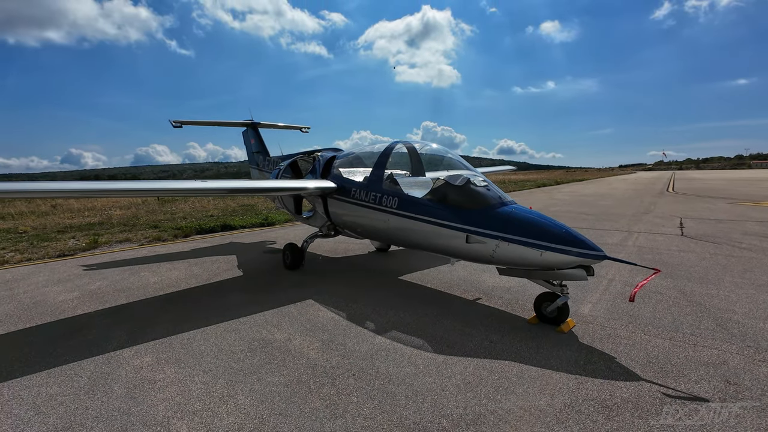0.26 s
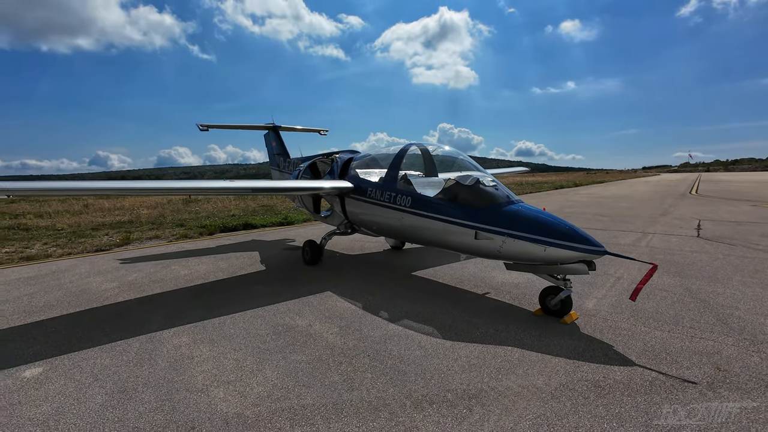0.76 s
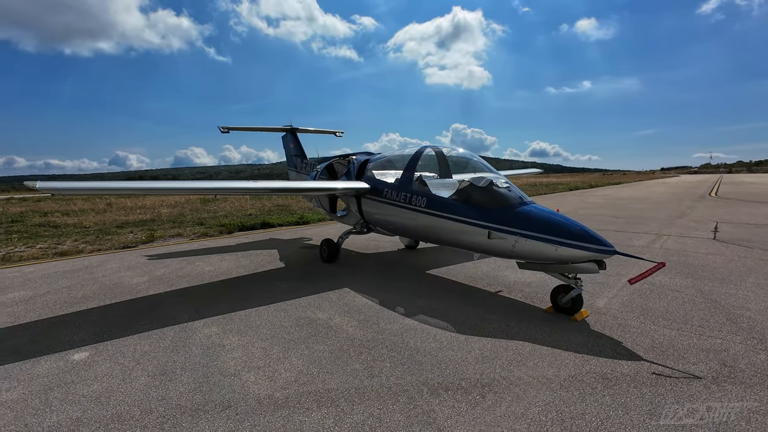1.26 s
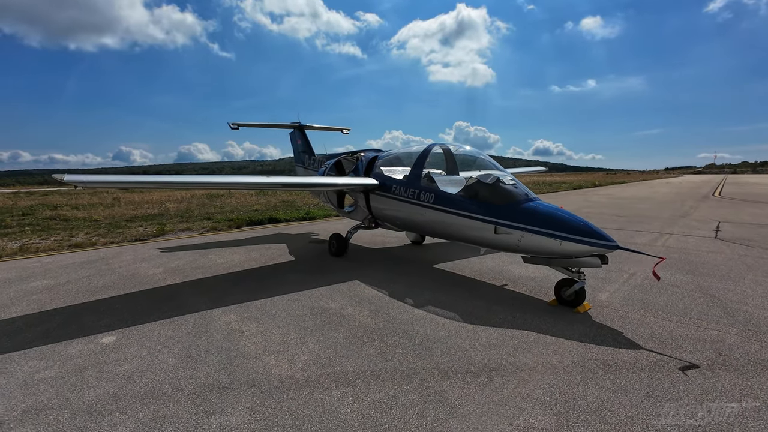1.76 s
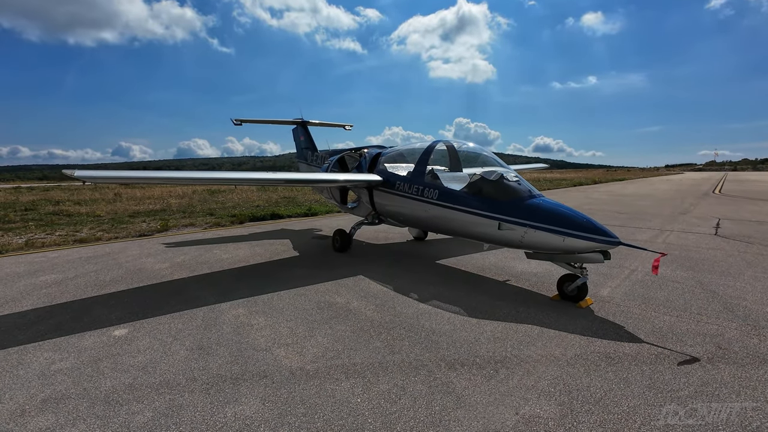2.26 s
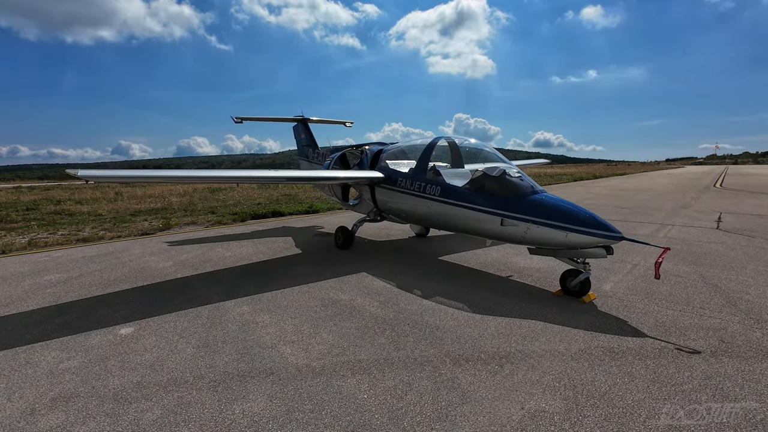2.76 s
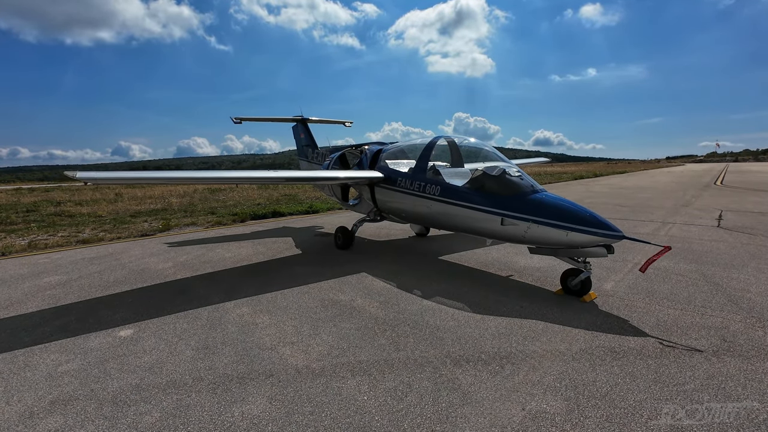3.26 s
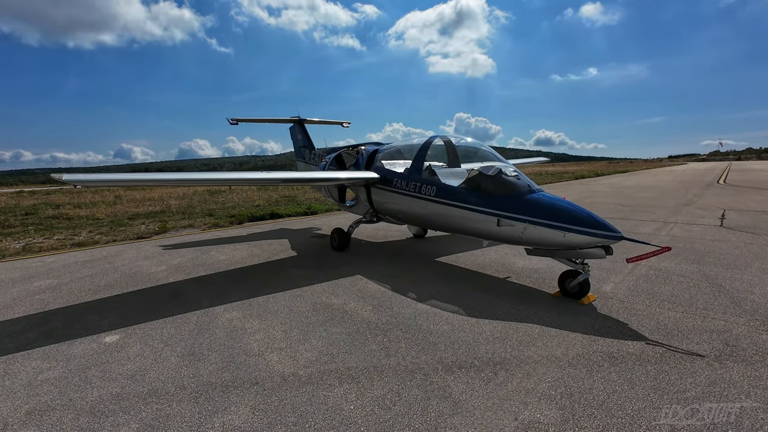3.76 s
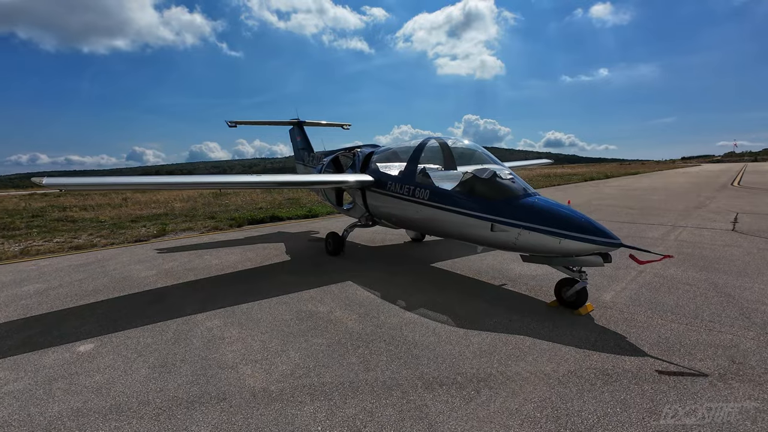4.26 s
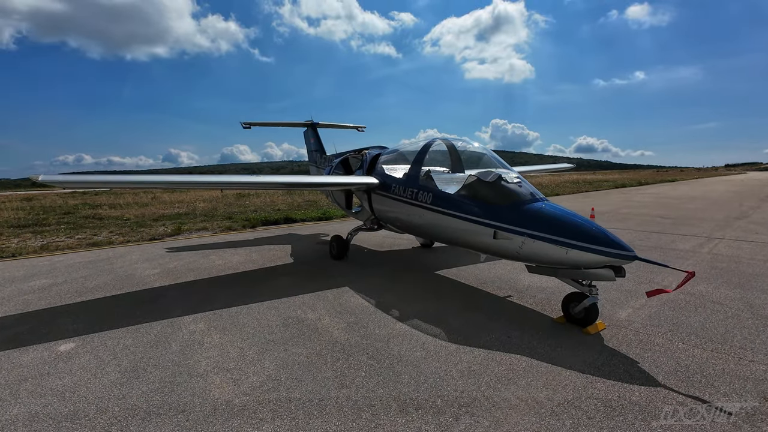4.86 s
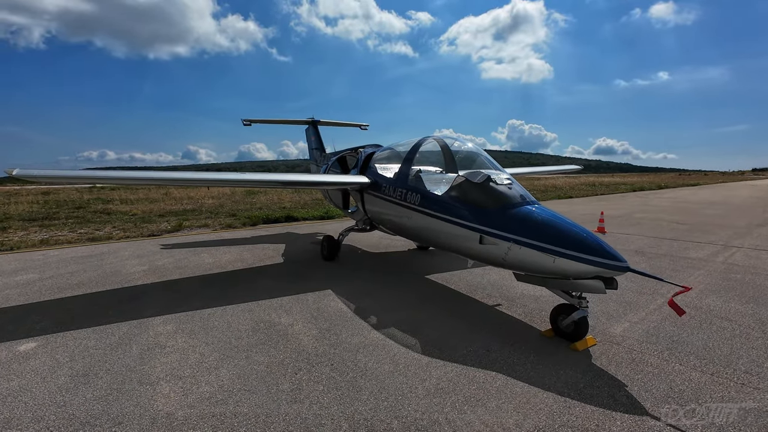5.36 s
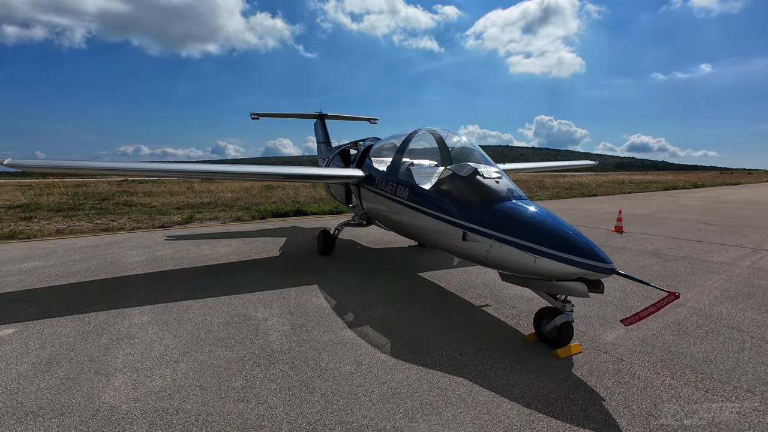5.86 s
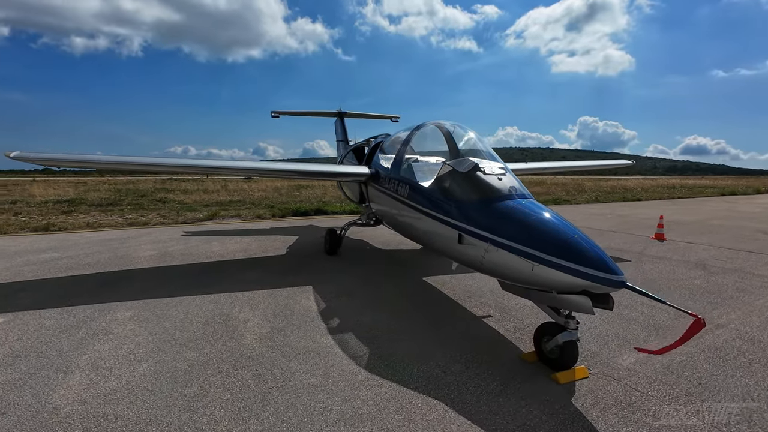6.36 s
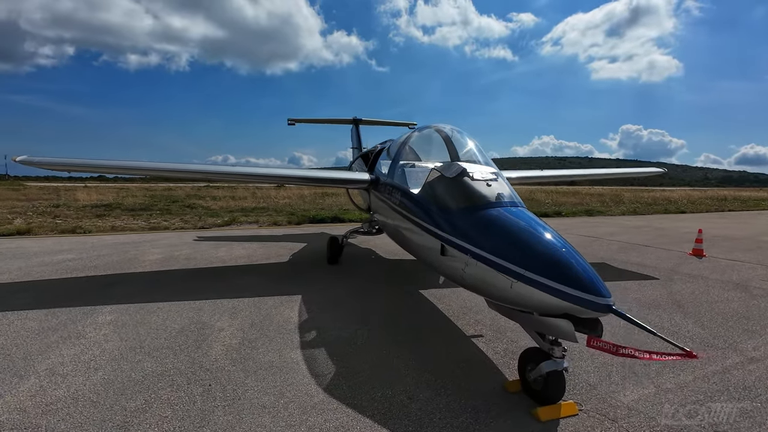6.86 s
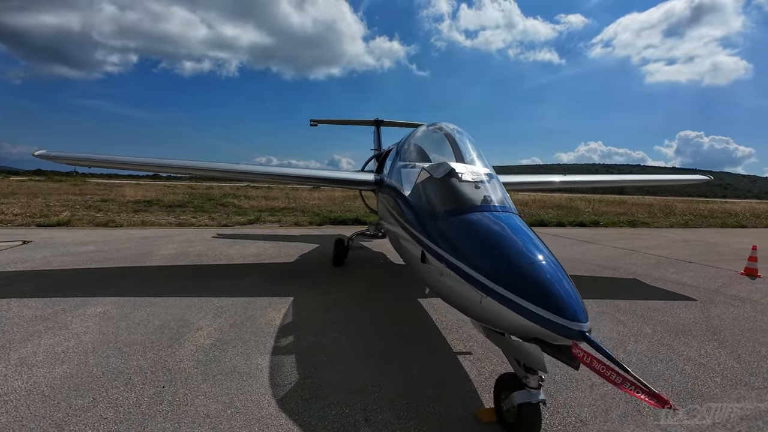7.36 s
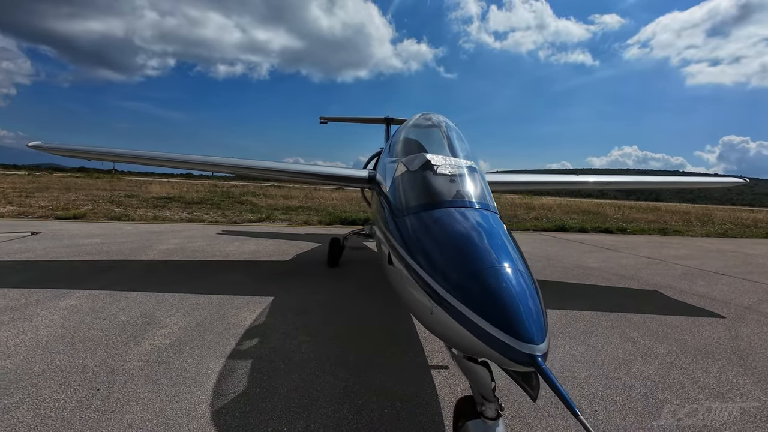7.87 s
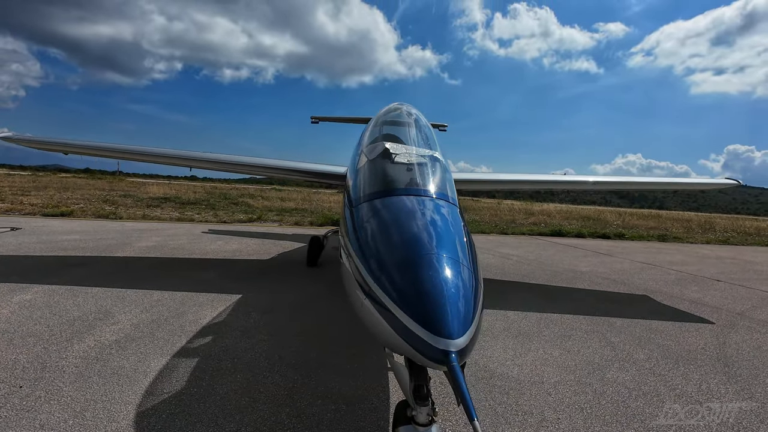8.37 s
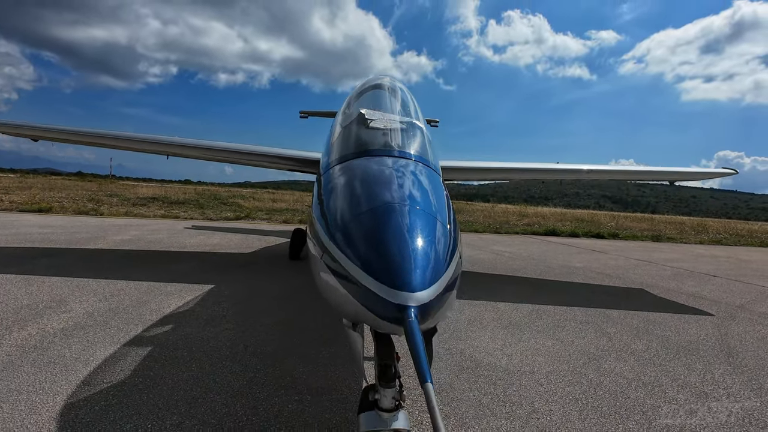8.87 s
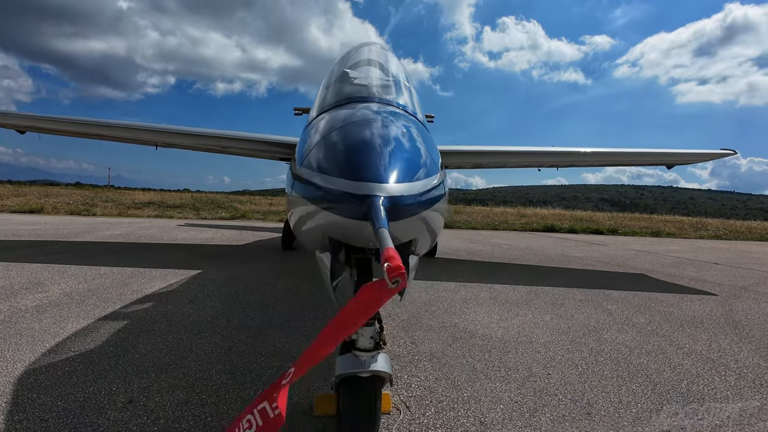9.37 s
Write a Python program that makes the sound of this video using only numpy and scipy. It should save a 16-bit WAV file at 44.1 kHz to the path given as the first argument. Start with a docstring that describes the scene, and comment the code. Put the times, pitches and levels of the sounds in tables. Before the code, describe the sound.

An idling jet engine runs throughout on an open apron, off to one side: low exhaust drone, thick midrange roar, a steady lower whine near 1 kHz and a piercing compressor whine near 3.2 kHz, flickering as the wind carries it. Airy hiss and very faint thin whistles sit above. A wind bump opens the scene; hard thumps hit the microphone at about 0.75 and 0.95 s, with softer low gusts until 2.5 s. The middle is calmer, mostly engine, with a small ribbon snap and knock at 4.7 s. From 6.5 s gusts come close together, rumbling and fluttering, with strong thuds around 6.8, 7.1, 7.8, 8.4 and 8.9 s, while the nearby ribbon ticks faintly and dryly. At 9.15 s comes the heaviest thump, then a sharp cloth whip at 9.24 s. The engine continues to the end at 9.6 s. Handheld camera microphone, mono bass, wide treble.

```python
"""Open airport apron, camera microphone carried round a parked aircraft, a jet engine idling off to one side.
From the start: roar, hum and hiss of coloured noise, compressor whines as wavering sines that fade on the wind,
and gusts that shake the microphone as low noise; from 0.7 s hard eddies thump it with single pressure pulses.
At 4.7 s a ribbon on the nose snaps; from 6.5 s it ticks among close-set gusts, and it whips hard at 9.2 s.
Low and middle bands are mono; the image is wide above an edge that first drops at 2.1 s and then now and again."""
import sys
import numpy as np
from scipy import signal
from scipy.fft import rfft, irfft, next_fast_len
from scipy.io import wavfile
from scipy.ndimage import uniform_filter1d, map_coordinates

SR = 44100
rng = np.random.default_rng(int(sys.argv[2]) if len(sys.argv) > 2 else 0)


def store_pcm(level_fs):
    """Save levels as 16-bit WAV."""
    pcm = np.round(np.clip(level_fs, -1, 1) * 32767).astype(np.int16)
    wavfile.write(sys.argv[1], SR, np.atleast_2d(pcm).T)


N = 423801  # samples


def amp(db):
    """Decibels to gain."""
    return 10 ** (np.asarray(db) / 20)


def unit(x):
    """Scale to rms 1."""
    return x / np.sqrt(np.mean(x ** 2) + 1e-20)


def along(points, hz):
    """(f/Hz, value) points read on a log frequency axis."""
    f, v = np.transpose(points)
    return np.interp(np.log(hz + 1), np.log(f + 1), v)


def curves(rows):
    """One value per sample for each column after the time."""
    s, *cols = np.transpose(rows)
    return [np.interp(np.arange(N) / SR, s, c) for c in cols]


def swing(rows):
    """A level curve in dB about its own mean."""
    db, = curves(rows)
    return db - db.mean()


def wobble(rate):
    """A smooth random curve, rate knots a second."""
    knots = rng.standard_normal(int(N * rate / SR) + 4)
    return map_coordinates(knots, [np.arange(N) * rate / SR])


def filtered(x, response):
    """x passed through a complex response of frequency."""
    m = next_fast_len(N + SR // 2)
    hz = np.fft.rfftfreq(m, 1 / SR)
    return irfft(rfft(x, m) * response(hz), m)[..., :N]


def noise(spectrum):
    """Coloured noise of rms 1."""
    return unit(filtered(rng.standard_normal(N), lambda hz: amp(along(spectrum, hz))))


def sine(hz):
    """A tone of rms 1 that follows a pitch curve."""
    cycles = np.cumsum(hz) / SR + rng.random()
    return np.sqrt(2) * np.sin(2 * np.pi * cycles)


PATCH_HZ, PATCH_S, PATCH_DB = 600, 0.4, 1.3  # width, duration and rms depth of the drifting patches


def drifting(spectrum):
    """Coloured noise of rms 1 in which moving air lifts and sinks patches of the spectrum."""
    hz, t, z = signal.stft(noise(spectrum), SR, nperseg=512)
    field = rng.standard_normal(z.shape)
    field = uniform_filter1d(field, int(PATCH_HZ / hz[1]), axis=0)
    field = uniform_filter1d(field, int(PATCH_S / t[1]), axis=1)
    patched = z * amp(PATCH_DB * unit(field))
    return unit(signal.istft(patched, SR, nperseg=512)[1][:N])


# low exhaust roar, spectrum before scaling to rms 1 (f/Hz, level/dB)
EXHAUST_SPECTRUM = [(20, -4), (60, -6), (130, -0.5), (200, -6.5), (350, -5.5), (500, -7), (700, -10.5),
                    (950, -14), (1400, -30.5), (4000, -74)]
# low exhaust roar over time (t/s, level/dB)
EXHAUST_LEVEL = [(0, -28.5), (4.3, -28.5), (5.2, -29), (6.3, -30.5), (8.7, -29.5), (9.61, -29)]
# main roar, spectrum before scaling (f/Hz, level/dB)
ROAR_SPECTRUM = [(400, -26.5), (750, -4.5), (950, -0.5), (1150, 0), (1500, -1.5), (1800, -5), (2100, -10.5),
                 (2500, -33), (4000, -45), (8000, -87.5)]
# lower rush, spectrum before scaling (f/Hz, level/dB)
RUSH_SPECTRUM = [(1200, -38), (1750, 0), (2100, 1.5), (2400, -3), (2900, -19), (4000, -51)]
# upper rush, spectrum before scaling (f/Hz, level/dB)
UPPER_RUSH_SPECTRUM = [(1700, -37), (2400, -3), (2850, 3), (3400, 0.5), (3950, -5.5), (4120, -16.5),
                       (6000, -54)]
# rush as the wind carries it over, before trims (t/s, lower band level/dB, upper band level/dB)
RUSH_LEVEL = [(0, -43.5, -45), (0.6, -49, -46), (1.3, -52, -45), (2.2, -46.5, -43.5), (3.1, -45.5, -45),
              (3.75, -41.5, -40.5), (4.5, -47.5, -41.5), (4.8, -44, -43.5), (5.15, -46, -44.5),
              (5.45, -44.5, -41), (5.95, -44.5, -44.5), (6.5, -48, -45), (7.3, -48.5, -47.5),
              (7.75, -45.5, -46.5), (8.2, -52, -48), (9.2, -46, -46), (9.61, -46.5, -50)]
# intake hiss, spectrum before scaling (f/Hz, level/dB)
HISS_SPECTRUM = [(2500, -10.5), (4200, -3), (4800, 1), (5400, 5), (6000, 1), (6600, -5), (7200, -22),
                 (9000, -51.5)]
# intake hiss over time, before a trim (t/s, level/dB)
HISS_LEVEL = [(0, -48), (0.45, -53), (1.7, -52), (2.15, -49), (2.55, -48), (3.0, -51.5), (3.45, -48.5),
              (4.3, -46.5), (5.3, -54.5), (5.8, -50), (6.8, -54.5), (7.6, -55.5), (8.25, -51),
              (8.85, -51.5), (9.25, -56), (9.61, -53.5)]
# upper intake hiss, spectrum before scaling (f/Hz, level/dB)
UPPER_HISS_SPECTRUM = [(5500, -20), (6700, 7), (7300, 7.5), (8200, 3.5), (8800, -12.5), (10700, -7),
                       (11500, -19.5), (12500, -13), (14500, -36), (15500, -60)]
# upper intake hiss over time (t/s, level/dB)
UPPER_HISS_LEVEL = [(0, -59.5), (0.45, -62.5), (0.9, -60.5), (1.4, -60.5), (1.95, -63), (2.1, -59),
                    (2.6, -63.5), (2.95, -62.5), (3.3, -61), (3.43, -58), (3.65, -61.5), (4.2, -62),
                    (4.8, -62.5), (5.25, -67), (5.65, -63), (6.05, -63), (6.18, -61), (6.3, -64.5),
                    (6.75, -65.5), (7.6, -65), (8.25, -61), (8.8, -61.5), (9.2, -64), (9.61, -61)]
# turbine's lower band, spectrum before scaling (f/Hz, level/dB)
SIZZLE_SPECTRUM = [(11000, -48), (12400, -7), (12850, 2), (13300, -9), (14000, -27)]
# turbine's lower band over time, before trims (t/s, level/dB)
SIZZLE_LEVEL = [(0.0, -56), (0.18, -69), (0.52, -57.5), (0.67, -70), (0.82, -65), (1.05, -73), (1.4, -71),
                (1.64, -64), (1.98, -71), (2.3, -77), (2.78, -70.5), (3.8, -70), (4.01, -73), (4.9, -76),
                (5.1, -72), (5.4, -76), (5.8, -69), (6.3, -71), (6.55, -75), (6.85, -65), (7.05, -77),
                (8.51, -79), (8.82, -70), (9.61, -80)]
# turbine's upper band, spectrum before scaling (f/Hz, level/dB)
FIZZ_SPECTRUM = [(12000, -38), (13300, -14), (13950, 2.5), (14350, -5), (14700, -20.5), (15200, -58)]
# turbine's upper band over time, before trims (t/s, level/dB)
FIZZ_LEVEL = [(0.0, -73), (0.77, -74), (1.31, -69.5), (1.87, -76), (3.53, -66.5), (3.74, -71), (6.72, -75),
              (7.73, -73), (8.06, -66), (8.59, -70), (8.81, -73), (9.61, -74)]
ROAR_DB, ROAR_FOLLOWS = -34.5, 0.12  # mean roar level; its dB per dB of lower rush


def jet_noise():
    """Exhaust roar and intake hiss; turbulent air makes the higher bands flicker more and shifts their colour."""
    rush_db, upper_rush_db = curves(RUSH_LEVEL)
    hiss_db, = curves(HISS_LEVEL)
    upper_hiss_db, = curves(UPPER_HISS_LEVEL)
    sizzle_db, = curves(SIZZLE_LEVEL)
    fizz_db, = curves(FIZZ_LEVEL)
    exhaust_db, = curves(EXHAUST_LEVEL)
    roar_db = ROAR_DB + ROAR_FOLLOWS * (rush_db - rush_db.mean())
    air = wobble(14)  # shared by roar, rush and hiss
    exhaust = amp(exhaust_db + 0.54 * wobble(5)) * noise(EXHAUST_SPECTRUM)
    roar = amp(roar_db + 0.58 * air) * noise(ROAR_SPECTRUM)
    rush = amp(rush_db + 1.5 + 0.48 * air) * noise(RUSH_SPECTRUM)
    upper_rush_db = upper_rush_db + 1.0 + 0.5 * air + 0.73 * wobble(16)
    rush += amp(upper_rush_db) * drifting(UPPER_RUSH_SPECTRUM)
    hiss = amp(hiss_db + 0.4 + 0.16 * air + 0.79 * wobble(14)) * drifting(HISS_SPECTRUM)
    hiss += amp(upper_hiss_db + 0.7 * air + 1.1 * wobble(16)) * drifting(UPPER_HISS_SPECTRUM)
    sizzle = amp(sizzle_db + 0.5 + 1.4 * wobble(20)) * noise(SIZZLE_SPECTRUM)
    fizz = amp(fizz_db + 2.0 + 1.4 * wobble(20)) * noise(FIZZ_SPECTRUM)
    return exhaust + roar + rush + hiss + sizzle + fizz


# compressor blade tone, pitch (t/s, f/Hz)
BLADE_PITCH = [(0, 3241), (0.5, 3239), (0.9, 3247), (1.5, 3243), (2.2, 3248), (2.9, 3246), (4.1, 3239),
               (4.55, 3252), (5.2, 3254), (5.5, 3250), (6.7, 3252), (7.0, 3246), (8.2, 3248), (9.1, 3242),
               (9.61, 3232)]
# compressor blade tone, before its gain (t/s, level/dB)
BLADE_LEVEL = [(0, -58), (0.11, -48.5), (0.2, -52), (0.3, -47.5), (0.42, -46), (0.5, -55), (0.64, -49.5),
               (0.8, -61), (0.93, -47), (1.15, -46.5), (1.24, -53), (1.38, -45), (1.44, -61), (1.69, -58),
               (1.78, -48), (1.92, -42.5), (2.07, -47), (2.2, -50), (2.36, -47), (2.43, -53), (2.6, -44),
               (2.82, -45.5), (2.95, -45), (3.0, -61), (3.15, -56), (3.35, -49.5), (3.75, -55), (3.97, -49),
               (4.45, -65), (4.55, -52), (4.63, -54), (4.75, -45.5), (5.02, -47.5), (5.2, -54), (5.4, -55),
               (5.5, -51), (5.64, -47.5), (5.72, -48), (5.8, -48), (5.96, -46.5), (6.2, -61), (6.31, -52),
               (6.39, -57), (6.55, -45.5), (6.66, -46), (6.82, -63), (6.98, -49), (7.04, -57), (7.13, -48),
               (7.21, -58), (7.27, -48), (7.44, -44.5), (7.7, -55), (7.84, -46.5), (8.1, -46.5),
               (8.48, -60), (8.57, -54), (8.68, -58), (8.74, -47), (8.86, -49.5), (8.95, -63), (9.05, -46),
               (9.28, -48), (9.44, -66), (9.61, -51)]
# the engine's lower whine (t/s, level/dB)
LOW_WHINE_LEVEL = [(0, -47), (0.6, -44), (1.3, -44), (1.9, -47), (2.7, -45.5), (3.3, -42.5), (3.9, -40),
                   (4.4, -47), (5.3, -44.5), (6.2, -42.5), (7.4, -46.5), (8.2, -50), (9.61, -51)]
# weaker tones of shafts and gears, before a trim (f/Hz, level/dB, fading depth/dB)
SHAFT_TONES = [(3506, -66, 2), (4686, -75, 2), (5845, -72, 2)]
# low drone of the engine, before a trim (f/Hz, level/dB)
DRONE = [(63, -27.5), (126, -35), (235, -41), (345, -39.5), (409, -48)]
BLADE_GAIN_DB = 4


def jet_tones():
    """Blade tones ride on the shaft speed and fade with the air; a rough drone lies under them."""
    pitch, = curves(BLADE_PITCH)
    blade_db, = curves(BLADE_LEVEL)
    low_whine_db, = curves(LOW_WHINE_LEVEL)
    sizzle_db, = curves(SIZZLE_LEVEL)
    fizz_db, = curves(FIZZ_LEVEL)
    speed = pitch / pitch.mean() * (1 + 0.000265 * wobble(25))  # relative shaft speed
    shimmer_db = 1.3 * wobble(32) + 0.5 * wobble(11)
    blade_hz = pitch * (1 + 0.00039 * wobble(30))
    tones = amp(blade_db + BLADE_GAIN_DB + shimmer_db) * sine(blade_hz)
    low_whine_hz = 1070.5 * speed * (1 + 0.00037 * wobble(15))
    tones += amp(low_whine_db + 0.7 * wobble(5)) * sine(low_whine_hz)
    carry_db = swing(HISS_LEVEL)  # the air carries the tones over together with the hiss
    for hz, db, fade_db in SHAFT_TONES:
        fading_db = fade_db * unit(wobble(3.42) + wobble(22))
        tone_hz = hz * speed * (1 + 0.000546 * wobble(24))
        tones += amp(db + 7.0 + carry_db + fading_db) * sine(tone_hz)
    # the turbine's thin whistles swell with the noise around them
    whistle_hz = 12840 * speed * (1 + 0.00079 * wobble(25))
    tones += amp(sizzle_db + 0.5 + 2.9 * wobble(16)) * sine(whistle_hz)
    tones += amp(fizz_db - 6.0 + 2.5 * wobble(16)) * sine(13908 * speed)
    for hz, db in DRONE:
        tones += amp(db - 3.0 + 2.1 * wobble(6)) * sine(hz + 1.165 * wobble(7))
    return tones


# difference between the two microphone ports, before a trim (f/Hz, side-to-mid level/dB)
PORT_WIDTH = [(700, -23), (1200, -20.5), (1800, -13.5), (2300, -6), (2850, -13.5), (3250, -8), (4200, -1),
              (5300, -7.5), (6000, 5), (6500, 4), (6950, -1), (7900, 11), (11000, 12.5), (14500, 7)]


def ports(direct, scattered):
    """Sound from the right reaches the left port late: the difference lags a quarter cycle, wider in the treble.
    Scattered sound adds an unrelated difference of the same spectrum."""
    def width(hz):
        return amp(along(PORT_WIDTH, hz) - 3.0)

    side = filtered(direct, lambda hz: -1j * width(hz))
    side = side + filtered(scattered, width)
    return np.array([direct + side, direct - side])


GUST_RISE_SHARE = 0.46  # part of a gust's length spent building up


def gust(peak_s, length_s):
    """Power envelope of one gust: a bell, length_s wide at half power, that builds a little faster than it dies."""
    t = np.arange(N) / SR - peak_s
    half_s = length_s * np.where(t < 0, GUST_RISE_SHARE, 1 - GUST_RISE_SHARE)
    return 0.5 ** np.minimum((t / half_s) ** 2, 60)


# rumble of wind at the microphone, spectrum before scaling (f/Hz, level/dB)
RUMBLE_SPECTRUM = [(10, -3), (25, 0), (50, 1.5), (80, -1.5), (110, -7.5), (170, -21.5), (300, -35.5),
                   (1000, -65), (3000, -101)]
# flutter of wind at the microphone, spectrum before scaling (f/Hz, level/dB)
FLUTTER_SPECTRUM = [(40, -27.5), (85, -10.5), (125, 1), (180, -4.5), (270, -9), (400, -17.5), (700, -24),
                    (1200, -38), (3000, -67.5), (8000, -100)]
# breeze on the microphone between gusts, before a trim (t/s, rumble level/dB)
BREEZE = [(0, -23), (1.3, -21.5), (1.7, -28), (1.9, -28.5), (2.8, -21), (3.1, -26), (3.9, -24.5),
          (4.5, -26.5), (5.3, -25.5), (6.3, -25.5), (6.9, -19), (8.3, -21.5), (8.9, -19), (9.61, -28.5)]
# gusts that hit the microphone, before trims (peak t/s, length/s, rumble level/dB, flutter level/dB)
GUSTS = [(0.01, 0.04, -13, -16.5), (0.392, 0.08, -19.5, -24.5), (0.766, 0.13, -14.5, -21),
         (0.876, 0.034, -18, -17), (0.938, 0.057, -11, -18.5), (1.122, 0.09, -16, -21),
         (1.922, 0.18, -18.5, -30.5), (2.15, 0.031, -14.5, -24), (2.482, 0.13, -17, -42),
         (3.394, 0.059, -34, -24), (3.57, 0.16, -22, -28), (3.96, 0.2, -24.5, -25), (5.05, 0.15, -24, -26),
         (5.448, 0.092, -20.5, -22.5), (6.606, 0.12, -19.5, -18.5), (6.758, 0.14, -19.5, -17.5),
         (6.86, 0.21, -17, -19.5), (6.988, 0.065, -18, -20.5), (7.118, 0.071, -18, -18.5),
         (7.294, 0.11, -19, -20), (7.522, 0.12, -18, -20.5), (7.698, 0.086, -16.5, -19.5),
         (7.843, 0.078, -16.5, -18), (8.018, 0.076, -19, -20.5), (8.362, 0.061, -20, -20.5),
         (8.45, 0.06, -21, -18), (8.56, 0.15, -16.5, -22.5), (8.736, 0.1, -21, -15.5),
         (8.858, 0.12, -19.5, -19), (9.14, 0.13, -22, -25.5)]
BREEZE_FLUTTER_DB, FLUTTER_FOLLOWS = -29, 0.4  # mean breeze flutter before a trim; its dB per dB of rumble


def wind():
    """Eddies shake the microphone: gusts add their rumble and flutter power to those of the breeze."""
    rumble_power = amp(curves(BREEZE)[0]) ** 2
    flutter_power = amp(BREEZE_FLUTTER_DB + FLUTTER_FOLLOWS * swing(BREEZE)) ** 2
    for peak_s, length_s, rumble_db, flutter_db in GUSTS:
        shape = gust(peak_s, length_s)
        rumble_power = rumble_power + amp(rumble_db) ** 2 * shape
        flutter_power = flutter_power + amp(flutter_db) ** 2 * shape
    rumble = np.sqrt(rumble_power) * amp(-1.0 + 1.6 * wobble(18)) * noise(RUMBLE_SPECTRUM)
    flutter = np.sqrt(flutter_power) * amp(-3.0 + 2.46 * wobble(40)) * noise(FLUTTER_SPECTRUM)
    return rumble + flutter


# turbulence of a hard eddy, spectrum before scaling (f/Hz, level/dB)
PUFF_SPECTRUM = [(50, -4), (130, 6), (260, 10), (550, 1.5), (900, -6.5), (1400, -19), (3500, -43),
                 (9000, -61), (15000, -77)]
# single hard eddies at the microphone (t/s, push level/dB, width/s, puff level/dB)
THUMPS = [(0.7485, -16, 0.00055, -16.5), (0.7517, -5.5, 0.0022, -14.5), (0.7697, -10, 0.0057, -30),
          (0.942, -8, .004, -28.5), (6.756, -13, 0.0022, -21), (6.7833, -5.5, .0011, -15.5),
          (6.819, -9, 0.0057, -34), (6.8653, -4, 0.0033, -22), (7.136, -6.5, .004, -27),
          (7.316, -13, 0.0014, -21), (7.846, -9, 0.003, -29), (8.378, -6, 0.0026, -30),
          (8.443, -9, 0.0014, -27), (8.824, -8, 0.0027, -29), (8.964, -7, 0.0027, -35),
          (9.152, -1.5, 0.0049, -26)]
PUFF_RISE_S, PUFF_FALL_S = 0.002, 0.006  # from half to full puff, and back to half


def thumps():
    """A hard eddy is a dip of pressure between two small rises, wrapped in a short puff of turbulence."""
    t = np.arange(N) / SR
    push, puffs = np.zeros(N), np.zeros(N)
    for s, db, width, puff_db in THUMPS:
        u2 = np.minimum(((t - s) / width) ** 2, 80)
        push -= amp(db) * (1 - u2) * np.exp(-u2 / 2)
        half_s = np.where(t < s, PUFF_RISE_S, PUFF_FALL_S)
        puffs += amp(puff_db) / (1 + ((t - s) / half_s) ** 2)
    return push + puffs * noise(PUFF_SPECTRUM)


def burst(s, t60, rise):
    """Envelope of a short crack that starts at s, with decay and rise times in seconds."""
    t = np.clip(np.arange(N) / SR - s, 0, 1)
    return (1 - np.exp(-t / rise)) * 10 ** (-3 * t / t60)


KNOCK_T60_S, KNOCK_OCTAVES = 0.027, 0.54  # a knock's decay and the half-width of its band


def knock(s, centre_hz):
    """A short ring of narrow noise around one pitch."""
    t = np.arange(SR // 8) / SR
    octaves = np.log2((np.fft.rfftfreq(len(t), 1 / SR) + 1) / centre_hz)
    band = 1 / (1 + (octaves / KNOCK_OCTAVES) ** 4)
    ring = unit(irfft(rfft(rng.standard_normal(len(t))) * band, len(t)))
    ring = ring * (1 - np.exp(-t / 0.0006)) * amp(-60 * t / KNOCK_T60_S)
    return np.pad(ring, (round(s * SR), N))[:N]


# ribbon snap, spectrum of crack and click (f/Hz, level/dB)
SNAP_SPECTRUM = [(500, -24), (1000, 1), (1600, 13.5), (2300, 5), (4300, 0.5), (6000, -5), (9000, -8),
                 (11000, -12), (14000, -17), (15000, -21), (16000, -34)]
# snaps of the ribbon, crack before a trim (t/s, crack level/dB, crack t60/s, knock level/dB, knock f/Hz)
SNAPS = [(4.6665, -41, 0.056, -41, 5200), (4.671, -43, .03, -28.5, 4000), (4.686, -44, .03, -26, 1700),
         (4.698, -42, .015, -40, 4000), (4.7103, -22, 0.013, -20, 1300), (9.2363, -16, 0.019, -14.5, 1600),
         (9.2373, -20, 0.013, -22.5, 4770), (9.241, -23.5, .018, -27, 2700), (9.247, -33, .02, -37, 4500),
         (9.2497, -28, .018, -32, 3800)]
# ribbon tick, spectrum before scaling (f/Hz, level/dB)
TICK_SPECTRUM = [(3000, -36), (7500, -14.5), (8800, 0), (10000, -6), (11500, -23), (15000, -26.5)]
# faint high ticks of the ribbon, before the envelope's rise (t/s, level/dB)
TICKS = [(6.5066, -51), (6.6084, -54), (6.9052, -49), (7.0229, -51), (7.1347, -55), (7.2792, -43.5),
         (7.3726, -51), (7.5243, -44), (7.6081, -47), (7.7327, -44), (7.855, -42.5), (7.953, -41),
         (8.0895, -46), (8.4492, -42), (8.8757, -47), (8.9695, -44.5), (9.1451, -45), (9.5807, -49)]
# tiny bright click, spectrum before scaling (f/Hz, level/dB)
GLINT_SPECTRUM = [(6000, -35), (11000, -12), (13500, 1), (15500, -2), (17000, -17)]
SNAP_CLICK_DB = 8  # impulse near the start of a snap, over the table's crack level, before its spectrum
CRINKLE_DB, CRINKLE_PER_S = 3, 1100  # depth and knots a second of the folds


def ribbon():
    """Sharp snaps with a knock when the cloth whips, faint ticks as it flutters, and one tiny bright click."""
    cracks = sum(amp(db - 3.0) * burst(s, t60, rise=0.00049) for s, db, t60, _, _ in SNAPS)
    crinkle = unit(amp(CRINKLE_DB * wobble(CRINKLE_PER_S)))  # the cloth gives way fold by fold
    whips = np.zeros(N)
    for s, db, _, _, _ in SNAPS:
        whips[round((s + 0.0007) * SR)] = amp(db + SNAP_CLICK_DB)
    clicks = filtered(whips, lambda hz: amp(along(SNAP_SPECTRUM, hz)))
    snaps = cracks * crinkle * noise(SNAP_SPECTRUM) + clicks
    knocks = sum(amp(knock_db) * knock(s, hz) for s, _, _, knock_db, hz in SNAPS)
    ticks = sum(amp(db) * burst(s, t60=0.022, rise=0.00055) for s, db in TICKS)
    glint = amp(-28) * burst(9.1458, t60=0.005, rise=0.0003)
    return snaps + knocks + ticks * noise(TICK_SPECTRUM) + glint * noise(GLINT_SPECTRUM)


def scene():
    """The engine stands off to one side; the ribbon is near the middle, wind and thumps are in it."""
    engine = ports(jet_noise() + jet_tones(), jet_noise())
    cloth = ribbon() + amp(-15) * ribbon() * np.array([[1], [-1]])
    return engine + cloth + wind() + thumps()


# spells when the stereo image opens lower down (start t/s, end t/s, edge f/Hz, factor on the thinning in dB)
OPENINGS = [(2.09, 2.15, 1600, 0.5), (2.39, 2.5, 1700, 0.68), (2.5, 2.89, 1450, 1.27),
            (2.89, 2.93, 1790, 1), (3.09, 3.182, 1710, 0.99), (6.60, 6.74, 1900, 1.1),
            (6.74, 6.81, 2200, 0.54), (6.81, 6.96, 1780, 1.3), (7.82, 8.2, 1600, 1.2),
            (8.2, 9.25, 1090, 0.76), (9.25, 9.7, 800, 0.77)]
# colour of the centre where the image is open, mostly thinner (f/Hz, level/dB)
THINNING = [(1000, -5.5), (1500, -5), (1850, -8), (2150, -7.5), (2500, 0.5), (3000, -3), (3300, -3.5),
            (3900, -6), (4100, 0)]


def narrowed(pair, edge_hz=4000):
    """Below the edge both channels carry one signal; above it the image is wide and its centre mostly thinner."""
    hz, t, (left, right) = signal.stft(pair, SR, nperseg=1024)
    edge = np.full(len(t), float(edge_hz))
    depth = np.ones(len(t))
    for start, end, low_hz, factor in OPENINGS:
        now = (t >= start) & (t < end)
        edge[now], depth[now] = low_hz, factor
    wide = np.clip((hz[:, None] - edge) / 120 + 0.5, 0, 1)  # the edge is 120 Hz broad
    thinning_db = wide * depth * along(THINNING, hz)[:, None]
    mid = (left + right) / 2 * amp(thinning_db)
    side = (left - right) / 2 * wide
    return signal.istft(np.array([mid + side, mid - side]), SR, nperseg=1024)[1][:, :N]


LOW_CUT_HZ, TOP_HZ = 19, 15700  # the microphone's half-amplitude low cut; the sharp upper limit


def record(dry):
    """The ports differ a little in colour, slow pressure is cut, low bands are mono and the top ends sharply."""
    lean = [(1200, 0.5), (2400, 1.5), (4400, 2.5), (8000, 0.0), (13000, -2.5)]  # (f/Hz, left-right level/dB)
    halves = np.array([[0.5], [-0.5]])
    pair = filtered(dry, lambda hz: amp(halves * along(lean, hz)))
    pair = filtered(pair, lambda hz: 1 - 1 / (1 + (hz / LOW_CUT_HZ) ** 6))
    return filtered(narrowed(pair), lambda hz: hz < TOP_HZ)


dry = scene()
out = record(dry)
store_pcm(out)
```